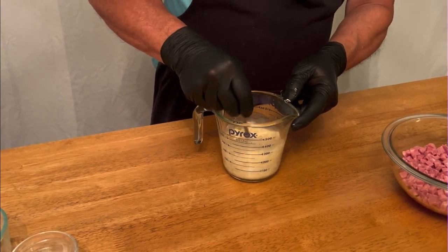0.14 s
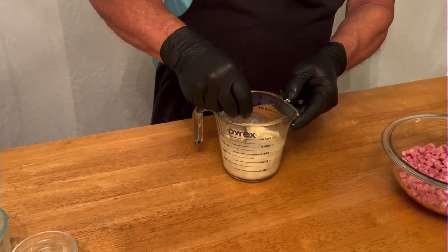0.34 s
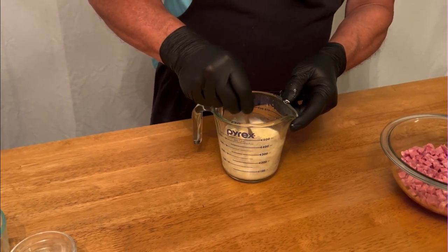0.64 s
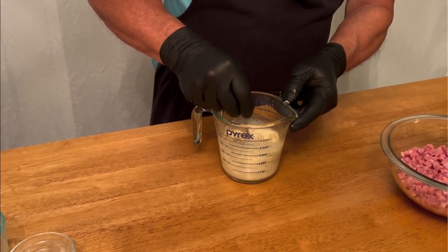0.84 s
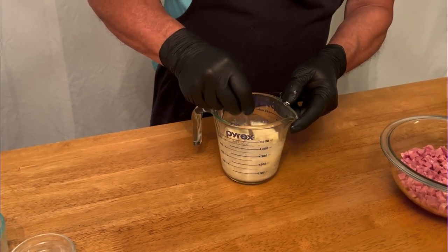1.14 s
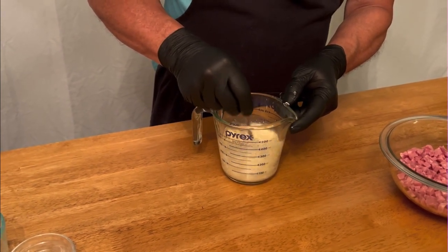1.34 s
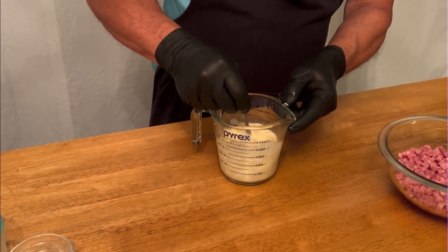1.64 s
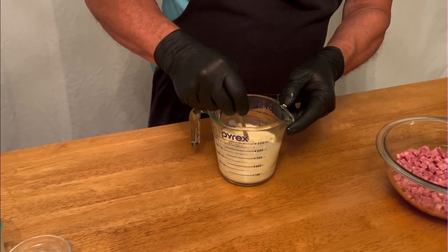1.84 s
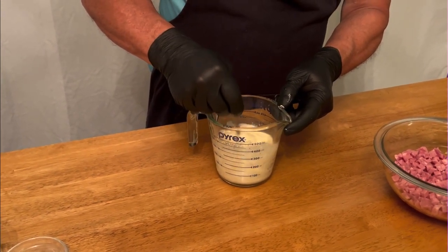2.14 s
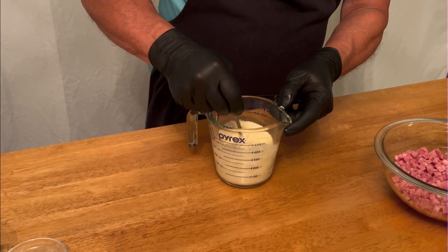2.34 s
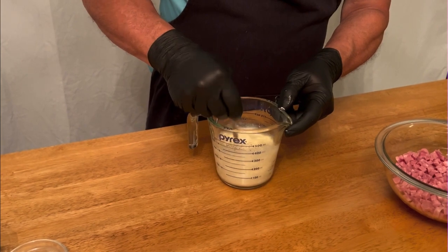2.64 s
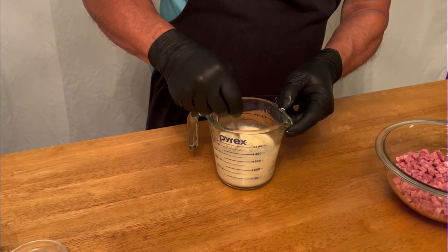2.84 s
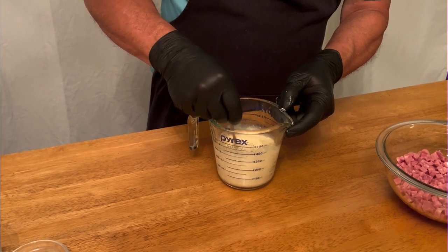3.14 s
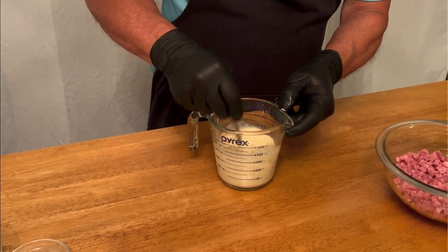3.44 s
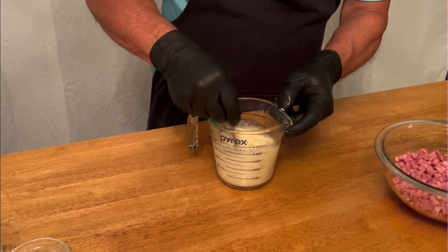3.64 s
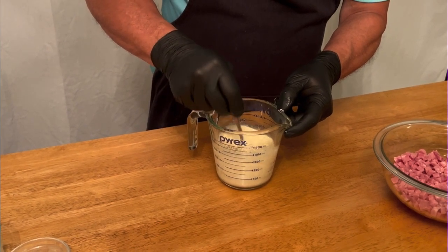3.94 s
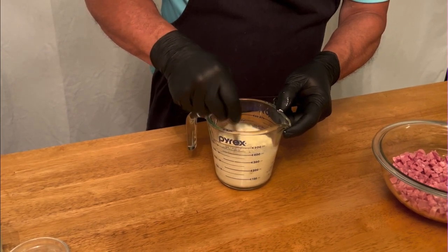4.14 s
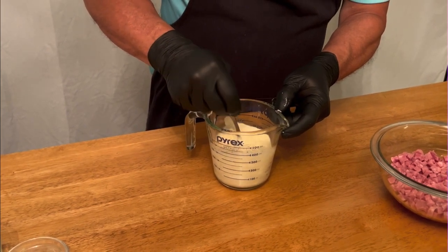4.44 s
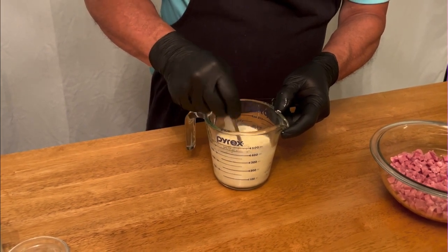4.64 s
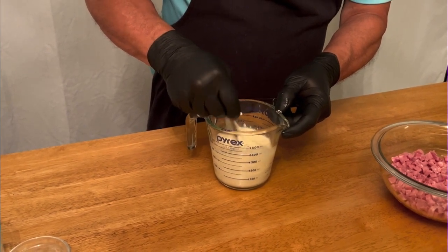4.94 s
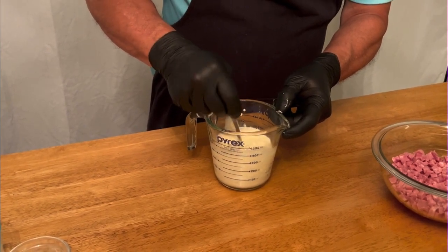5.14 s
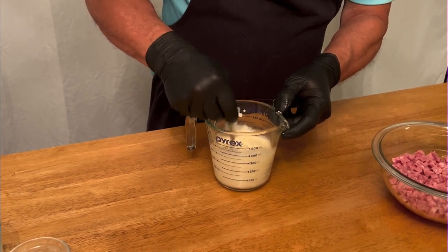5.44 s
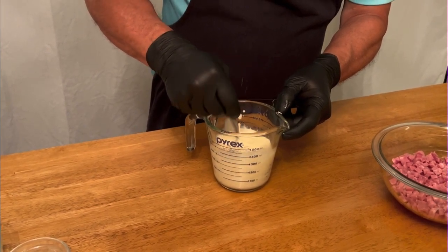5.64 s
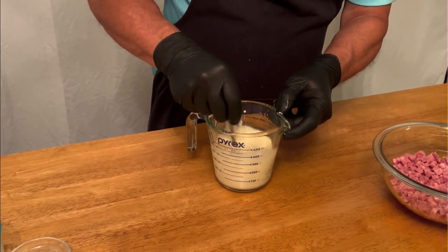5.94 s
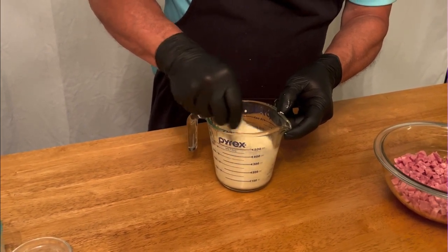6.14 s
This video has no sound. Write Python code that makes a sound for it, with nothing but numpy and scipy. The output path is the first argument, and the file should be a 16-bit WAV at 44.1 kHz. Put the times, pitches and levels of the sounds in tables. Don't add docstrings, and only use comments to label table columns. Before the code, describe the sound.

Close stereo sound in a small, lively kitchen. From 0 to 3 seconds a metal utensil whips thick dressing in a glass jug with easy, regular strokes about 0.17 seconds apart, skipping a beat near 1.6 where there is a faint drag and a slow wet fold. Each stroke is a short, damped glass clink with a sharp metal tick, a hollow wooden knock and soft low thump, then a tiny rising bloop. Slosh, swish and small wet ticks fill the gaps; heavier folds come around 2.5 to 2.7. From 3.2 to 5.7 the blows are louder, mostly doubled by a rebound clink 20 to 40 milliseconds later, with stronger table rumble, a shove near 4.3 and a scrape at 4.45. The rumble then falls away; clearer rim taps ring at 5.9 and 6.1, followed by tiny touches and a parting scrape by 6.3.

```python
import sys
import numpy as np
from scipy import signal
from scipy.fft import rfft, irfft, next_fast_len
from scipy.io import wavfile
from scipy.ndimage import uniform_filter1d

SR = 44100
rng = np.random.default_rng(int(sys.argv[2]) if len(sys.argv) > 2 else 0)


def invert_db(level):
    return 10 ** (np.asarray(level, dtype=float) / 20)


def store_pcm(level_fs):
    pcm = np.round(np.clip(level_fs, -1, 1) * 32767).astype(np.int16)
    wavfile.write(sys.argv[1], SR, np.atleast_2d(pcm).T)


N = 276507


def evened(x):
    return x / np.sqrt(np.mean(x ** 2) + 1e-20)


def read(points, hz):
    f, value = np.transpose(points)
    return np.interp(np.log(hz + 1), np.log(f + 1), value)


def coloured(x, points):
    gain = invert_db(read(points, np.fft.rfftfreq(x.shape[-1], 1 / SR)))
    return irfft(rfft(x) * gain, x.shape[-1])


def add(mix, s, sound):
    part = mix[..., round(s * SR):][..., :sound.shape[-1]]
    part += sound[..., :part.shape[-1]]


def ring(hz, db, t60, rise_s, phase=0, lag_s=0, climb=0, size=9000):
    ones = np.ones(len(hz))
    hz, db, t60, phase, lag_s = ((np.array(v) * ones)[:, None] for v in (hz, db, t60, phase, lag_s))
    t = np.maximum(np.arange(size) / SR - lag_s, 0)
    envelope = invert_db(db - 60 * t / t60) * -np.expm1(-t / rise_s)
    x = (envelope * np.sin(2 * np.pi * hz * t * (1 + climb * t) + phase)).sum(0)
    return x / abs(x).max()


def burst(tone, t60, rise_s=0.00078, size=2048):
    t = np.arange(size) / SR
    envelope = invert_db(-60 * t / t60) * -np.expm1(-t / rise_s)
    x = coloured(rng.standard_normal(size), tone) * envelope
    return x / abs(x).max()


def causal(points):
    log_gain = np.log(invert_db(read(points, abs(np.fft.fftfreq(4096, 1 / SR)))))
    return np.fft.ifft(np.exp(np.conj(signal.hilbert(log_gain)))).real[:2048]


# [f/Hz, level/dB, t60/s]
JUG_MODES = [(1344, -15.5, 0.14), (1450, -2.5, 0.044), (1660, -14.5, 0.14), (1720, -32.5, 0.073),
             (2200, 7.5, 0.0086), (2290, -3, 0.015), (2457, -1.5, 0.023), (2435, -3.5, 0.014),
             (2822, -1.5, 0.024), (2949, -9, 0.067), (3220, -17, 0.023), (3200, -13.5, 0.074),
             (3690, -19, 0.014), (3874, -7, 0.033), (4400, -28, 0.036), (4276, 7.5, 0.012),
             (4620, 16, 0.0047), (5190, -13, 0.05), (6700, 11, 0.0025), (8100, -60, .02),
             (10130, -21.5, 0.0067)]
# [f/Hz, level/dB]
CRACK_TONE = [(120, -46), (300, -3), (800, -6), (1500, 0.5), (1900, -6.5), (2500, -12), (4400, -4.5),
              (5300, -48), (9000, -19.5)]
# [f/Hz, level/dB]
FAR_CRACK_TONE = [(120, -61), (300, -2.5), (800, -2), (1500, -6), (2000, -5.5), (3100, 2.5), (4200, -8),
                  (5600, -28.5)]
# [f/Hz, level/dB]
TICK_TONE = [(4000, 1.5), (6000, -2.5), (8000, 2), (10300, 3), (12000, -5), (14000, 3), (15600, -12)]
FAR_DULL_DB_PER_OCT, FAR_GLINT_DB = -2, 3.5


def clink(db, tick_db, glint_hz, far):
    hz, mode_db, t60 = np.transpose(JUG_MODES)
    chance = rng.standard_normal((3, len(JUG_MODES)))
    hz = hz * (1 + 0.0058 * chance[2])
    mode_db = mode_db + far * FAR_DULL_DB_PER_OCT * abs(np.log2(hz / glint_hz))
    out = invert_db(db - 2.0) * ring(hz, mode_db + 3.1 * chance[0], t60, 0.0023, 1.86 * chance[1], size=4000)
    glint = ring([glint_hz, 0.97 * glint_hz], 0, 0.019, 0.00092, size=2048)
    add(out, 0.0007, invert_db(db - 5.5 + far * FAR_GLINT_DB) * glint)
    add(out, 0.0004, invert_db(db + 0.5) * burst(FAR_CRACK_TONE if far else CRACK_TONE, 0.0058))
    add(out, 0, invert_db(db + tick_db) * burst(TICK_TONE, 0.0053, 0.00042))
    return out


# [t/s, clink level/dB, tick rel level/dB, table knock rel level/dB, glint f/Hz]
EASY = [(0.0305, -28, 5, -1.5, 2700), (0.2107, -22.5, -1.5, -5, 3010), (0.39, -21, -1.5, -4, 1505),
        (0.5746, -22.5, 1.5, -8.5, 1630), (0.7466, -21.5, -1, -4.5, 4280), (0.9169, -24, 4.5, -1, 1660),
        (1.089, -25, 3, 0.5, 2170), (1.262, -27, 4, 0, 3020), (1.4364, -21.5, 0, -3.5, 1500),
        (1.7804, -23, 3.5, -1.5, 2240), (1.9658, -26, 0.5, -5, 3690), (2.138, -24, 2, -5.5, 4560),
        (2.3132, -23.5, 4.5, -4.5, 4380), (2.4859, -24, 3, -1.5, 2170), (2.671, -36, -1, -3, 2200),
        (2.832, -20.5, 1, -3.5, 1660), (3.0107, -22.5, 2, -5, 2270)]
# [t/s, clink level/dB, tick rel level/dB, table knock rel level/dB, glint f/Hz]
HARD = [(3.1849, -22.5, 2, 0.5, 1560), (3.3548, -16, -1, -5.5, 2290), (3.5275, -20.5, 4, -2.5, 1950),
        (3.703, -22, 4.5, -1.5, 2020), (3.8736, -19.5, 4, -3, 1624), (4.0457, -16, 1, -3, 2400),
        (4.2195, -17, 3.5, -5, 2464), (4.397, -17, 1, -4.5, 1540), (4.573, -18, 7.5, -2.5, 2380),
        (4.7518, -17, 2, -3.5, 2670), (4.9276, -15, 0, -3, 2200), (5.1052, -17, 3.5, -2.5, 2280),
        (5.2787, -17, 4, -2.5, 3000), (5.4594, -17, 1.5, -10, 2200), (5.635, -17, -2, -9.5, 4080),
        (5.894, -18.5, 10, -10.5, 2350), (6.099, -16.5, 4.5, -16.5, 3540)]
# [t/s, clink level/dB, tick rel level/dB, dull wall tap rel level/dB, glint f/Hz]
REBOUNDS = [(0.346, -38.5, 7, -14, 1605), (0.876, -36.5, 11.5, -19, 2400), (3.3822, -28.5, -1, -27, 1650),
            (3.5447, -21, -7, -17, 1620), (3.7231, -22, -6, -10, 1650), (3.9011, -26.5, 2, -13, 2190),
            (4.071, -24, -3.5, -6, 2420), (4.2545, -25, 6, -9, 3200), (4.4219, -13.5, -6, -17, 2730),
            (4.6041, -16.5, 2, -15.5, 2910), (4.775, -15.5, -0.5, -11.5, 2850),
            (4.949, -14.5, 0.5, -11.5, 2230), (5.131, -14.5, 4, -17, 2500),
            (5.2957, -18.5, -2.5, -13, 2880), (5.6209, -50, 19, -1.5, 2350),
            (6.1356, -29.5, 6, -14.5, 3700), (6.1724, -45.5, -16, 1.5, 1680), (6.2294, -31.5, 10, 5, 2200),
            (6.2455, -47, -2, 5, 1280)]
# [f/Hz, level/dB, t60/s]
WALL_MODES = [(745, -3, 0.02), (945, 9, 0.028), (900, -7, 0.12), (1140, -1, 0.03), (1210, -8, .06)]


def clinks():
    out = np.zeros(N)
    wall = ring(*np.transpose(WALL_MODES), 0.00025, size=4096)
    for k, (s, db, tick_db, _, glint_hz) in enumerate(EASY + HARD + REBOUNDS):
        add(out, s, clink(db, tick_db, glint_hz, k >= len(EASY + HARD)))
    for s, db, _, wall_db, _ in REBOUNDS:
        add(out, s, invert_db(db + wall_db + 11.5) * wall)
    return out


# [t/s, room level/dB, table hum level/dB, table thump level/dB, table bass level/dB]
STROKES = [(0.0303, -27.5, -42, -40.5, -44.5), (0.2099, -22, -41, -39, -39.5),
           (0.39, -16, -42.5, -36.5, -40), (0.5736, -26, -43, -38.5, -42), (0.7467, -20.5, -40, -34, -40.5),
           (0.9168, -22, -42.5, -37, -36), (1.0894, -26, -41, -39, -40.5), (1.2615, -29, -44.5, -42, -39.5),
           (1.4356, -21, -40, -35.5, -35.5), (1.7799, -21.5, -43.5, -35.5, -36),
           (1.9654, -24, -42.5, -38, -41.5), (2.138, -21, -38, -34.5, -38.5), (2.3126, -22, -38, -34, -34),
           (2.4862, -19, -34.5, -34, -36), (2.6708, -34, -41, -38.5, -39), (2.832, -17, -36.5, -30.5, -35),
           (3.0111, -19.5, -37, -35, -35), (3.1852, -12.5, -34, -31, -36.5),
           (3.3548, -19.5, -35, -28.5, -37.5), (3.5274, -17, -36.5, -31, -36), (3.702, -13, -32, -32, -35),
           (3.8741, -18.5, -36.5, -31, -38.5), (4.0457, -11, -36, -30, -35.5),
           (4.2193, -14.5, -35.5, -29, -34.5), (4.3974, -10.5, -35, -28.5, -34),
           (4.573, -21.5, -34.5, -31, -35.5), (4.7516, -8, -34, -30, -37), (4.9287, -10.5, -35, -29, -35),
           (5.1053, -14.5, -36, -30.5, -35.5), (5.2764, -11, -32, -26, -33.5),
           (5.4595, -20.5, -38, -33, -37.5), (5.6351, -22, -41.5, -32.5, -42.5),
           (5.8935, -12.5, -55.5, -58, -60), (6.0985, -10.5, -47.5, -47, -55)]


def bare_blows():
    out = np.zeros(N)
    for s, db, tick_db, *_ in EASY + HARD + REBOUNDS:
        add(out, s, invert_db(db + tick_db + 9.0) * causal(TICK_TONE))
    for (s, *_), (_, room_db, *_) in zip(EASY + HARD, STROKES):
        add(out, s, invert_db(room_db + 19.5) * causal(CRACK_TONE))
    for s, db, *_ in REBOUNDS:
        add(out, s, invert_db(db + 19.0) * causal(FAR_CRACK_TONE))
    return out


# [f/Hz, left minus right level/dB]
PORT_TILT = [(60, 0), (110, .5), (200, 6), (710, 6), (900, 3.5), (1300, .5), (15000, 0)]


def table(modes, rise_s, lag_turns, tilt_db, lead_rad, climb=0):
    hz, db, t60 = np.transpose(modes)
    chance = rng.standard_normal((2, len(modes)))
    hz = hz * (1 + 0.01 * chance[0])
    db = db + 2.4 * chance[1]
    db = db + tilt_db * np.log2(hz / np.median(hz))
    right_db = db - read(PORT_TILT, hz)
    left = ring(hz, db, t60, rise_s, 0, lag_turns / hz, climb)
    right = ring(hz, right_db, t60, rise_s, -lead_rad, lag_turns / hz, climb)
    return -np.array([left, right * invert_db(right_db).sum() / invert_db(db).sum()])


# [f/Hz, level/dB, t60/s]
KNOCK_MODES = [(591, -10, 0.041), (696.3, -5, 0.13), (712.2, 1.5, 0.21), (756, -6.5, 0.13),
               (805, -6.5, 0.19), (841, 15, 0.025), (887.5, -1, 0.1), (933, -6, 0.13)]
# [f/Hz, level/dB, t60/s]
HUM_MODES = [(188, 0, 0.28), (160, -13, 0.3)]
# [f/Hz, level/dB, t60/s]
THUMP_MODES = [(250, 2, 0.22), (272, 5, 0.04), (305, -7, 0.07)]
# [f/Hz, level/dB, t60/s]
BASS_MODES = [(50.6, -0.5, 0.57), (61.7, -12.5, 0.26), (101.2, 0, 0.16), (86.7, 3.5, 0.17)]
EASY_TILT_DB_PER_OCT, HARD_TILT_DB_PER_OCT = -6, 6
KNOCK_LEAD_RAD, THUD_LEAD_RAD, BASS_LEAD_RAD = 1, 0.7, 0.82
KNOCK_RISE_PER_S = 0.68
SETTLE_DB, SETTLE_S = -1.5, 0.0026


def table_knocks():
    out = np.zeros((2, N))
    tilts_db = [EASY_TILT_DB_PER_OCT] * 6 + [HARD_TILT_DB_PER_OCT] * 5
    settle = invert_db(-SETTLE_DB * np.expm1(-(np.arange(9000) / SR / SETTLE_S) ** 2))
    knocks = [settle * table(KNOCK_MODES, 0.0014, 0.64, tilt_db, KNOCK_LEAD_RAD, KNOCK_RISE_PER_S)
              for tilt_db in tilts_db]
    groups = ((HUM_MODES, THUD_LEAD_RAD), (THUMP_MODES, THUD_LEAD_RAD), (BASS_MODES, BASS_LEAD_RAD))
    thuds = [[table(modes, 0.0024, 0.62, 0, lead_rad) for modes, lead_rad in groups] for _ in tilts_db]
    for k, (blow, stroke) in enumerate(zip(EASY + HARD, STROKES)):
        s, db, _, knock_db, _ = blow
        _, _, hum_db, thump_db, bass_db = stroke
        place = k % 6 if k < len(EASY) else 6 + k % 5
        add(out, s, invert_db(db + knock_db + 5.5) * knocks[place])
        for thud, thud_db in zip(thuds[place], (hum_db + 8.5, thump_db + 7.0, bass_db + 6.0)):
            add(out, s, invert_db(thud_db) * thud)
    return out


GRIT_PER_S, GRIT_DB, GRIT_T60_S, GRIT_SPREAD_DB = 240, -20, 0.18, 3.5


def grit():
    hits = np.zeros(N)
    for s, db, *_ in EASY + HARD + REBOUNDS:
        add(hits, s + 0.0041, invert_db(np.array([db])))
    trail = signal.lfilter([1], [1, -invert_db(-60 / (GRIT_T60_S * SR))], hits)
    size = invert_db(GRIT_DB + GRIT_SPREAD_DB * np.minimum(rng.exponential(1, N), 4))
    size = size * (rng.random(N) < GRIT_PER_S / SR)
    kind = rng.integers(0, 4, N)
    return sum(signal.oaconvolve(trail * size * (kind == k), burst(CRACK_TONE, 0.0075, size=512))[:N]
               for k in range(4))


# [t/s, level/dB, t60/s]
SCRAPES = [
    (1.622, -66, 0.1),
    (1.6465, -55, .09),
    (4.4465, -36, 0.018),
    (6.258, -43, .05),
]
# [t/s, level/dB, f/Hz, t60/s]
RIM = [(0.391, -34, 1660, 0.24), (0.749, -56, 1660, .16), (2.835, -40, 1676, 0.18), (4.424, -33, 1660, .15),
       (5.635, -26, 2310, 0.059), (5.8956, -36, 1660, 0.23), (6.0992, -31, 1676, 0.22),
       (6.099, -22, 2410, .05), (6.0995, -23, 2010, 0.034), (6.136, -36, 1660, .17),
       (5.8944, -26, 3990, .06), (5.8945, -27.5, 6560, 0.032)]


def scrapes():
    out = np.zeros(N)
    for s, db, t60 in SCRAPES:
        add(out, s, invert_db(db) * burst(CRACK_TONE, t60, 0.002, size=4096))
    for s, db, hz, t60 in RIM:
        add(out, s, invert_db(db) * ring(hz * np.array([1, 1.014, 0.979, 1.037]), [0, -5, -7, -10], t60, 0.0012))
    return out


BLOOP_HZ, BLOOP_RISE_HZ_PER_S, BLOOP_LAG_S, BLOOP_T60_S, BLOOP_DB = 1250, 7000, 0.011, 0.09, -39


def bloops():
    out, t = np.zeros(N), np.arange(5000) / SR
    chances = rng.standard_normal((len(EASY + HARD), 3))
    for (s, db, _, knock_db, _), chance in zip(EASY + HARD, chances):
        hz = BLOOP_HZ * (1 + 0.061 * chance[0]) + BLOOP_RISE_HZ_PER_S * (1 + 0.23 * chance[1]) * t
        level_db = BLOOP_DB + 0.77 * (db + knock_db + 33.5) + 2 * chance[2]
        shape = invert_db(level_db - 60 * t / BLOOP_T60_S) * -np.expm1(-t / 0.0042)
        add(out, s + BLOOP_LAG_S, shape * np.sin(2 * np.pi * np.cumsum(hz) / SR))
    return out


# [t/s, fizz level/dB, plop f/Hz]
TICKS = [(0.082, -40, 2700), (0.5372, -65, 6540), (0.5444, -68, 4070), (0.719, -49, 2430),
         (0.7957, -32, 4250), (1.051, -48, 7150), (1.57, -55, 2600), (1.915, -61, 2700), (2.624, -54, 3200),
         (2.6479, -76, 2360), (2.8025, -78, 4400), (3.1378, -58, 2500), (4.709, -42, 3130),
         (4.8808, -55, 3020), (5.0334, -61, 2320), (5.036, -39, 3200), (5.059, -43, 2970),
         (5.4326, -53, 2380), (6.032, -60, 4030), (4.379, -42, 3220), (4.913, -44, 2370),
         (4.563, -41, 6400)]
PLOP_DB, PLOP_FOLLOW = -61, 0.45


def wet_ticks():
    out = np.zeros(N)
    for s, fizz_db, plop_hz in TICKS:
        add(out, s, invert_db(fizz_db) * burst(TICK_TONE, 0.0086))
        plop_db = PLOP_DB + PLOP_FOLLOW * (fizz_db - PLOP_DB)
        add(out, s, invert_db(plop_db) * ring([plop_hz], 0, 0.02, 0.00065, size=2048))
    return out


def wash(level_db, tone, patchy_db, size):
    frames, hz = 4 * N // size + 5, np.fft.rfftfreq(size, 1 / SR)
    a, b, c, d, patches = rng.standard_normal((frames, len(hz), 5)).T
    patches = uniform_filter1d(patches, size=8, axis=0)
    patches = evened(uniform_filter1d(patches, size=6, axis=1))
    z = np.array([a + 1j * b, c + 1j * d]) * invert_db(read(tone, hz)[:, None] + patchy_db * patches)
    x = evened(signal.istft(z, nperseg=size, noverlap=3 * size // 4)[1][:, :N])
    return x * invert_db(level_db)


def swells(at_s, db, width_s):
    t = np.arange(0, N + 255, 256) / SR
    bells = db * np.exp(-((t[:, None] - at_s) / width_s) ** 2)
    return np.interp(np.arange(N) / SR, t, bells.sum(1))


# [t/s, level/dB]
EFFORT = [(0, -35.5), (1.3, -34.5), (1.8, -30), (1.97, -29.5), (2.5, -25.5), (2.67, -32), (2.83, -22),
          (3.0, -31.5), (3.2, -30), (5.1, -28), (5.3, -30), (5.5, -26), (5.8, -26), (5.87, -44),
          (6.27, -53)]
# [t/s, level over rumble/dB, width/s]
SHOVES = [
    (0.26, 4, 0.046),
    (4.268, 9.5, 0.069),
    (5.59, 3.5, 0.079),
]
# [t/s, level over slosh/dB, width/s]
FOLDS = [
    (1.653, 10.5, 0.038),
    (2.518, 14, .04),
    (2.689, 13, 0.035),
    (3.207, 8, 0.022),
]
# [f/Hz, level/dB per Hz]
RUMBLE_TONE = [(15, -36), (30, -11), (50, -4.5), (70, 0), (95, -11.5), (130, -6), (200, -34), (320, -31),
               (600, -79.5)]
# [f/Hz, level/dB per Hz]
SLOSH_TONE = [(100, -14), (200, -4), (320, -8), (400, -5), (470, -3), (600, -9), (800, -23), (1500, -44)]
# [f/Hz, level/dB per Hz]
SWISH_TONE = [(400, -26.5), (800, 7), (1600, 3), (2000, -1), (3500, -7), (6000, -14), (14000, -37.5)]
MID_EFFORT_DB = -30
RUMBLE_DB, RUMBLE_FOLLOW, RUMBLE_STROKE_DB = -47.5, 0.78, 5
SLOSH_DB, SLOSH_FOLLOW, SLOSH_STROKE_DB = -65, 0.62, 11.5
SWISH_DB, SWISH_FOLLOW, SWISH_STROKE_DB = -74, 0.32, 21
STROKE_LAG_S, STROKE_WIDTH_S = 0.034, 0.039


def washes():
    effort = np.interp(np.arange(N) / SR, *np.transpose(EFFORT)) - MID_EFFORT_DB
    stroke = swells(np.transpose(EASY + HARD)[0] + STROKE_LAG_S, 1.0, STROKE_WIDTH_S)
    shove, fold = swells(*np.transpose(SHOVES)), swells(*np.transpose(FOLDS))
    rumble_db = RUMBLE_DB + RUMBLE_FOLLOW * effort + RUMBLE_STROKE_DB * stroke + shove
    slosh_db = SLOSH_DB + SLOSH_FOLLOW * effort + SLOSH_STROKE_DB * stroke + fold
    swish_db = SWISH_DB + SWISH_FOLLOW * effort + SWISH_STROKE_DB * stroke
    rumble = wash(rumble_db, RUMBLE_TONE, 3.0, size=2048)
    slosh = wash(slosh_db, SLOSH_TONE, 4.0, size=1024)
    swish = wash(swish_db, SWISH_TONE, 5.7, size=512)
    return rumble + slosh + swish


# [t/s, level/dB]
ECHOES = [(.0022, -9), (.0048, -16), (.0072, -11), (.0105, -17), (.015, -15), (.022, -18)]


def echoed(x):
    out = x.copy()
    for s, db in ECHOES:
        add(out, s, invert_db(db) * x)
    return out


# [f/Hz, t60/s]
KITCHEN_T60 = [(100, .42), (260, .33), (700, .31), (1840, .31), (4850, .295), (12800, .24)]
# [f/Hz, level/dB]
KITCHEN_TONE = [(100, -3.5), (400, 0.5), (1000, -5), (1350, -1), (1700, 2.5), (2000, -6), (3300, -3),
                (6000, -4), (14000, -19)]


def kitchen(x):
    taps = np.zeros((3, 2, SR // 2))
    slots = np.arange(160, SR // 2 - 20, 20)
    at = slots + rng.integers(0, 20, (3, 2, len(slots)))
    np.put_along_axis(taps, at, rng.choice([-1., 1.], at.shape), 2)
    hz, t, z = signal.stft(taps, SR, nperseg=256)
    decay = invert_db(-60 * t / read(KITCHEN_T60, hz)[:, None])
    tail = signal.istft(z * decay, SR, nperseg=256)[1]
    tail = coloured(tail / np.linalg.norm(tail[0, 0]), KITCHEN_TONE)
    turn = 2 * np.pi * (np.arange(N) / SR * 1.3 + np.arange(3)[:, None] / 3)
    fed = x * np.sqrt((1 + np.cos(turn)) / 3)
    return signal.fftconvolve(fed[:, None], tail, axes=2)[..., :N].sum(0)


# [f/Hz, left lead/rad]
PORT_LEAD = [(0, 0), (1000, -1), (1460, -2), (1720, -.1), (2930, .8), (4820, .6), (5680, -.9), (6120, -.1),
             (7490, -.4), (9040, -2.5), (10900, -4), (12500, -6), (15200, -8.7), (16500, -9.3)]
# [f/Hz, likeness/1]
PORT_SAME = [(60, .25), (250, .7), (500, .5), (900, .7), (1400, .5), (2200, .55), (3500, .45), (5500, .4),
             (7000, .8), (9000, .75), (10000, .97), (11000, .8), (15000, .85)]


def ports(direct, diffuse):
    size = next_fast_len(N)
    hz = np.fft.rfftfreq(size, 1 / SR)
    same = np.clip(read(PORT_SAME, hz), 0, 1)
    one, other = rfft(diffuse, size)
    shift = invert_db(-read(PORT_TILT, hz)) * np.exp(-1j * np.interp(hz, *np.transpose(PORT_LEAD)))
    right = (rfft(direct, size) + same * one + np.sqrt(1 - same ** 2) * other) * shift
    return np.array([direct + diffuse[0], irfft(right, size)[:N]])


def scene():
    air, blows, wood = clinks(), bare_blows(), table_knocks()
    wet = wet_ticks()
    under = washes()
    wet = wet + bloops() + scrapes()
    room = kitchen(blows + 0.48 * air + 0.54 * wood[0] + 0.14 * wet)
    direct = echoed(air + 0.026 * blows + grit())
    return ports(direct + wet, room + under) + wood


def roll_off(x):
    return signal.sosfilt(signal.butter(12, 16850, fs=SR, output="sos"), x)


EDGE_HZ = 16700


def record(dry):
    cut = signal.sosfilt(signal.butter(2, 30, "highpass", fs=SR, output="sos"), dry)
    cut = signal.sosfilt(signal.butter(12, EDGE_HZ, fs=SR, output="sos"), cut)
    return roll_off(cut)


dry = scene()
out = record(dry)
store_pcm(out)
```